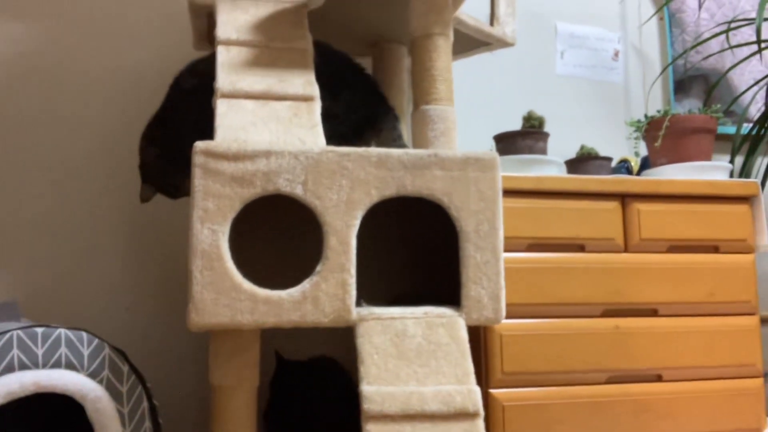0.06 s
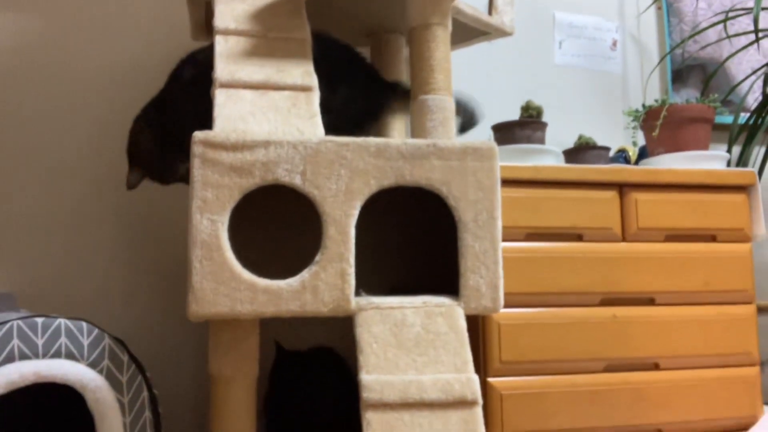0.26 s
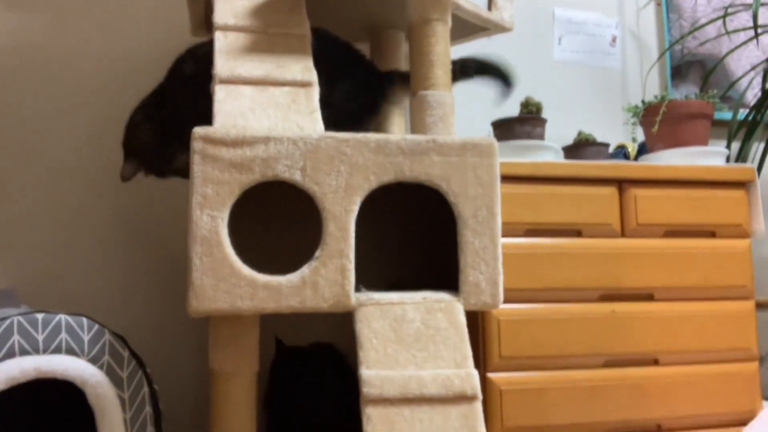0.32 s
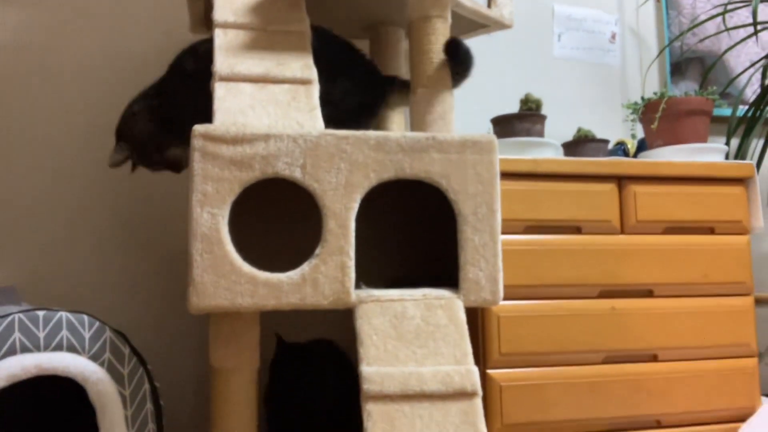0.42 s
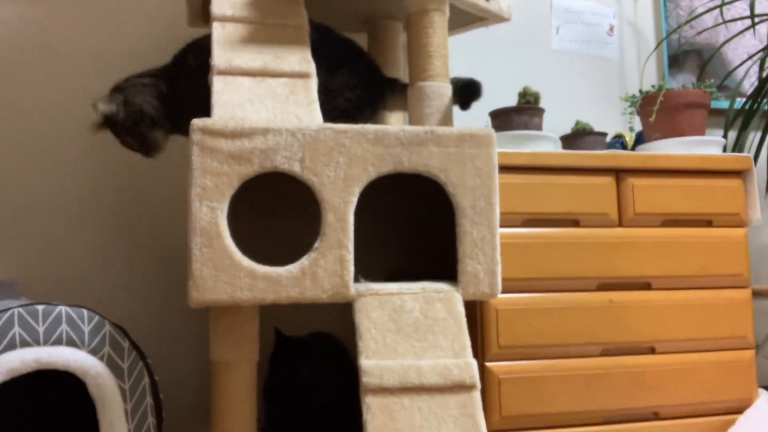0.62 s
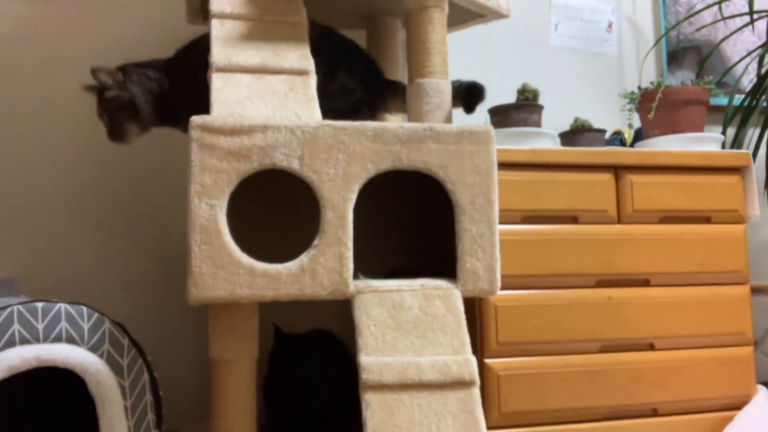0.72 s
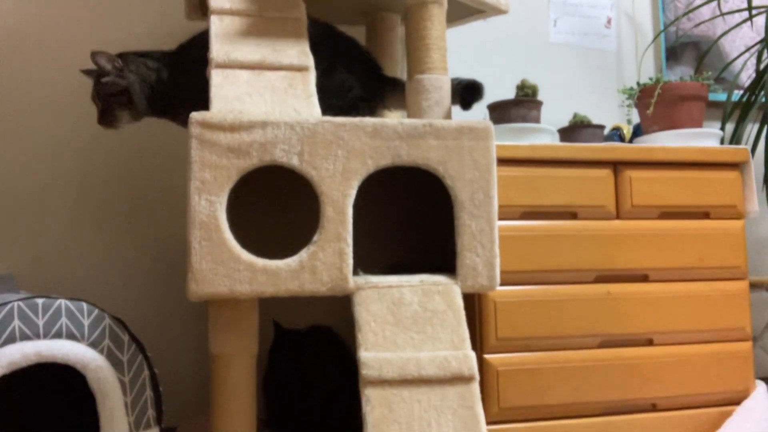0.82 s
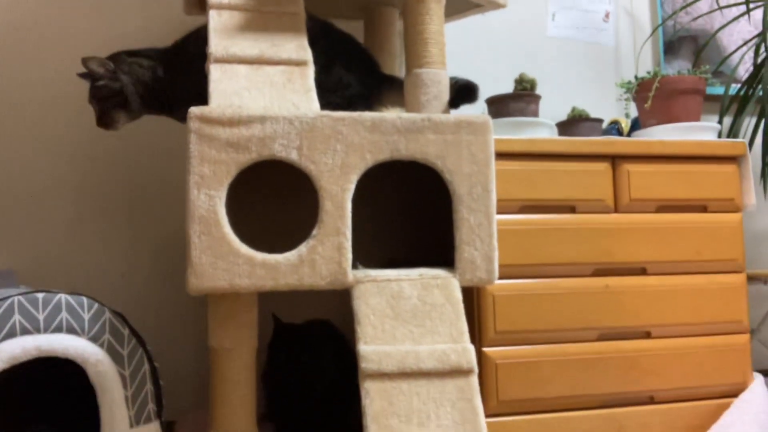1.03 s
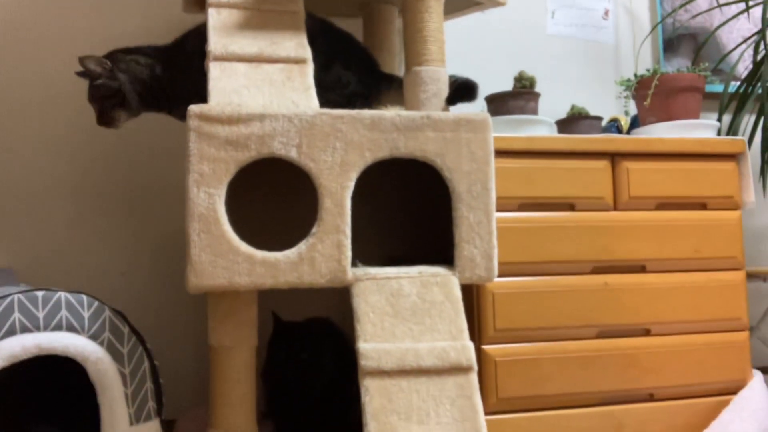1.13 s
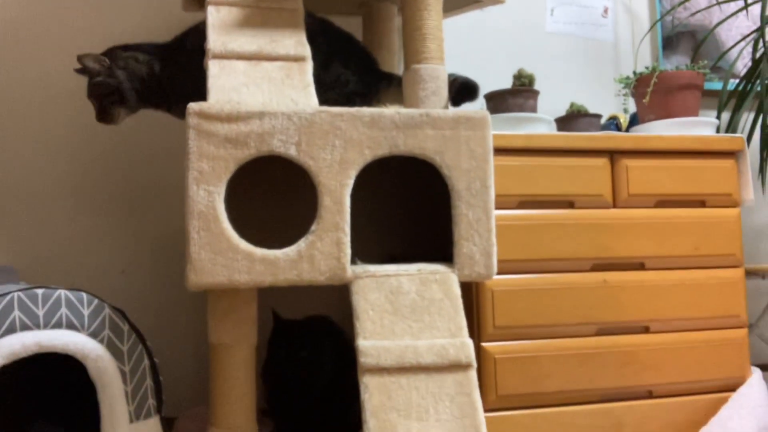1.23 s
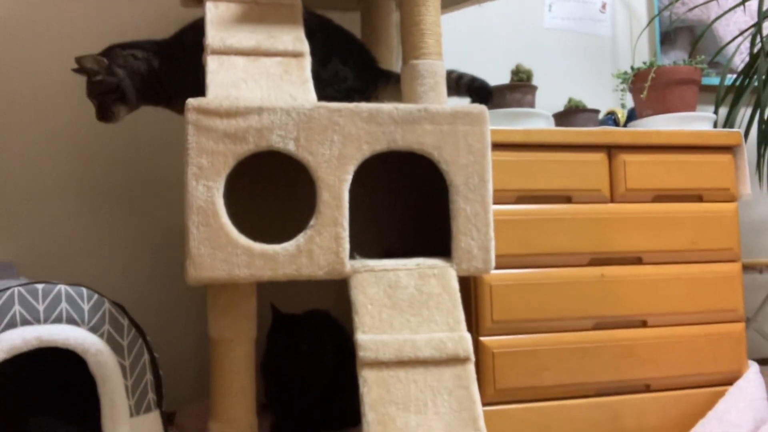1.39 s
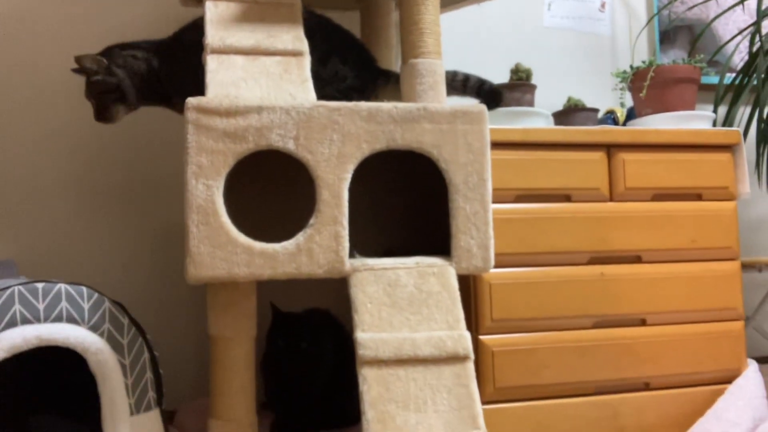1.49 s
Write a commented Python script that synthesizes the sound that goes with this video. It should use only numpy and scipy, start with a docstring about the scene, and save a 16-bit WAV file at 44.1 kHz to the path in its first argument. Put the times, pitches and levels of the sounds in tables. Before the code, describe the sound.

A bumped microphone thuds twice, first with a gritty scuff, amid soft finger taps indoors.

```python
"""A very quiet room, beside a cat tree: a hand-held camera takes two bumps.
Each knock travels through the casing to the microphone as a quick falling thud, treble first, bass last.
The first bump drags into a short, gritty scuff that overloads the microphone.
In between, fingers tap and shift softly over a faint bed of room tone."""
import sys
import numpy as np
from scipy import signal
from scipy.fft import rfft, irfft
from scipy.io import wavfile
from scipy.ndimage import uniform_filter1d

SR = 44100
rng = np.random.default_rng(int(sys.argv[2]) if len(sys.argv) > 2 else 0)


def output_pcm(signal):
    """Save a mono or channel-first signal as 16-bit PCM at the path in sys.argv[1].

    Samples are clipped to [-1, 1] before scaling.
    """
    pcm = np.clip(np.atleast_2d(signal).T, -1, 1) * 32767
    wavfile.write(sys.argv[1], SR, np.round(pcm).astype(np.int16))


N = 68355

# room tone, mostly low end: f/Hz, level/dB
ROOM_EQ = [(20, -19), (65, 8), (180, -2.5), (350, -12), (700, -18.5), (2000, -23), (5000, -28),
           (9500, -38.5), (14000, -25.5), (16000, -27.5)]
# light shifts of the grip: t/s, length/s, level/dB
GRIP_SHIFTS = [(0, .07, -57), (.05, .06, -49.5), (.09, .1, -60), (.158, 0.079, -47.5), (.82, 0.02, -60),
               (.92, 0.12, -61), (1.05, 0.059, -56), (1.16, 0.061, -55), (1.38, .04, -59.5)]
# muffled tone of the grip: f/Hz, level/dB
GRIP_EQ = [(20, -41), (50, -10.5), (78, 11), (130, -10), (200, -9.5), (450, -37.5), (700, -35.5),
           (1500, -53), (4000, -58.5)]
# soft finger taps: t/s, level/dB, roll-off f/Hz
FINGER_TAPS = [(.058, -4, 192), (.060, 14.5, 78), (.2075, 15.5, 135), (.2222, 4, 649), (.452, -11, 230),
               (.6112, -5, 464), (.636, -5, 127.8), (.8008, -1, 433), (.9069, -1, 395), (1.079, -6, 247),
               (1.1745, -6.5, 379), (1.2312, -6.5, 887), (1.391, -11.5, 219), (1.451, -18.5, 800),
               (1.452, -4, 109.4)]
# body of a tap: f/Hz, level/dB
TAP_EQ = [(20, -26), (45, -9.5), (75, -2), (130, -8), (200, 4), (280, -8), (370, 1), (480, -5),
          (700, -11.5), (1100, -8.5), (2000, -17.5), (16000, -25.5)]
# rubs on the casing, one envelope each; the third ends in a faint tail that lingers after the second knock:
# t/s, rumble level/dB, grit level/dB
SCUFF_ENVELOPES = [
    [(.212, -53.5, -85.5), (.222, -68, -66), (.232, -22.5, -53), (.242, -23.5, -43.5), (.251, -14, -26),
     (.258, -9.5, -11), (.277, -15.5, -14), (.286, -19, -20.5), (.301, -21, -25.5), (.308, -39, -37),
     (.314, -48.5, -55.5), (.333, -71, -86.5)],
    [(.94, -67, -90), (.975, -63, -86.5), (1.02, -77.5, -92.5)],
    [(1.228, -59.5, -99), (1.24, -39, -63), (1.25, -36.5, -39.5), (1.256, -34.5, -31.5),
     (1.266, -25, -34.5), (1.275, -34, -53.5), (1.281, -52, -74), (1.305, -78.5, -77.5),
     (1.4, -91.5, -87.5)],
]
# low layer of a scuff: f/Hz, level/dB
RUMBLE_EQ = [(20, -27), (50, -9), (75, 3.5), (160, 2), (260, -1.5), (400, 3), (650, -10), (1000, -26),
             (2000, -38.5), (6000, -71.5)]
# mid layer of a scuff: f/Hz, level/dB
GRIT_EQ = [(100, -26), (400, -1.5), (700, 9.5), (1500, 3.5), (2200, -7), (3200, -15), (5000, -20.5),
           (7000, -31), (10000, -43.5), (16000, -50)]
# top layer of a scuff: f/Hz, level/dB
FIZZ_EQ = [(3000, -38.5), (8000, -15), (10500, -9.5), (13000, 2), (16000, 3.5)]
# attacks of the crispest contacts: t/s, length/s, level/dB
SNAP_HITS = [(.2426, 0.0024, -32), (1.2520, 0.0024, -48), (1.4508, 0.0033, -73.5)]
# bright edge of a snap: f/Hz, level/dB
SNAP_EQ = [(500, -25.5), (2000, 5), (3300, 5.5), (5000, -1.5), (9000, -7), (13000, -8), (16000, -5)]
# knocks and duller rebounds on the casing: t/s, level/dB, roll-off f/Hz
KNOCK_HITS = [(.2427, 39, 1566), (.2433, 39.5, 182.8), (.2559, 43, 146.3), (.2613, 38, 700),
              (.2692, 38, 330), (.2723, 33.5, 260), (.2817, 33, 150), (.2921, 29.5, 909.6),
              (1.2519, 36, 1403), (1.2690, 25.5, 171.4)]
# body of a knock: f/Hz, level/dB
KNOCK_EQ = [(20, -31.5), (45, -16.5), (70, -3), (110, -1.5), (170, 1.5), (260, -2), (500, -1), (850, -12),
            (1500, -14.5), (2500, -19), (3300, -7.5), (5000, -20), (9000, -9.5), (15000, -4.5)]
# how late sound gets through the casing: f/Hz, approximate lag/cycles
CASING_LAG = [(40, 1.5), (80, 1.35), (140, 1.75), (250, 1.18), (600, 1.02), (2000, .92)]

TIME = np.arange(N) / SR
FREQS = np.fft.rfftfreq(2 * N, 1 / SR)  # padded, so tails do not wrap round


def amp(db):
    """Decibels to gain."""
    return 10 ** (np.asarray(db) / 20)


def curve_at(points, hz):
    """Reads a table on a log-frequency axis, with its corners rounded."""
    f, value = np.transpose(points)
    grid = np.linspace(0, np.log(SR), 1000)
    curve = np.interp(grid, np.log(f), value)
    rounded = uniform_filter1d(uniform_filter1d(curve, size=25), size=25)
    return np.interp(np.log(hz + 1), grid, rounded)


def noise(eq):
    """Steady noise through an EQ curve, rms 1."""
    gain = amp(curve_at(eq, np.fft.rfftfreq(N, 1 / SR)))
    shaped = irfft(rfft(rng.standard_normal(N)) * gain, N)
    return shaped / np.sqrt(np.mean(shaped ** 2) + 1e-20)


def steadied(x):
    """Levels out the slow swells of a noise, as under a steady pressure."""
    return x / np.sqrt(abs(uniform_filter1d(x ** 2, size=900)) + 1e-9)


def swells(rows):
    """Gain envelope with one swell a row: quick attack, slower release."""
    return sum(amp(db) * np.sin(np.pi * np.clip((TIME - start) / length, 0, 1) ** .7)
               for start, length, db in rows)


def thuds(hits, eq, slope):
    """Impulses through a shared body EQ, each with its own low-pass: harder contact is brighter."""
    spectrum = 0
    for start, db, rolloff_hz in hits:
        low_pass = 1 / np.sqrt(1 + (FREQS / rolloff_hz) ** (2 * slope))
        spectrum += amp(db) * low_pass * np.exp(-2j * np.pi * FREQS * start)
    return irfft(spectrum * amp(curve_at(eq, FREQS)))[:N]


def room_tone():
    """The still room: a barely audible low bed with a trace of hiss."""
    return amp(-74) * noise(ROOM_EQ)


def grip():
    """Faint low rubs as the fingers shift."""
    return swells(GRIP_SHIFTS) * steadied(noise(GRIP_EQ))


def taps():
    """Fingertips land on the casing with small, soft thumps."""
    return thuds(FINGER_TAPS, TAP_EQ, slope=2.5)


def scuffs():
    """Skin drags over the casing: low rumble, uneven grit on top, and fizz when it presses hard."""
    grain_db, grain_s = 2, .002
    grain = amp(grain_db * np.interp(TIME / grain_s, np.arange(N), rng.standard_normal(N)))
    rumble = steadied(noise(RUMBLE_EQ))
    grit = steadied(noise(GRIT_EQ) * grain)
    fizz = steadied(noise(FIZZ_EQ) * grain)
    mix = np.zeros(N)
    for envelope in SCUFF_ENVELOPES:
        times, rumble_db, grit_db = np.transpose(envelope)
        rumble_gain = amp(np.interp(TIME, times, rumble_db))
        grit_gain = amp(np.interp(TIME, times, grit_db))
        fizz_gain = amp(-17) * grit_gain ** 1.7  # the top end opens faster than the grit
        gate = (TIME > times[0]) & (TIME < times[-1])
        mix += (rumble * rumble_gain + grit * grit_gain + fizz * fizz_gain) * gate
    return mix


def snaps():
    """A few milliseconds of crack at the moment of hard contact."""
    return swells(SNAP_HITS) * noise(SNAP_EQ)


def knocks():
    """Two bumps on the casing, each a bright hit with duller rebounds."""
    return thuds(KNOCK_HITS, KNOCK_EQ, slope=3.9)


def casing(contacts):
    """Each frequency arrives a cycle or two late, so the bass trails and every hit falls in pitch."""
    delay_s = curve_at(CASING_LAG, FREQS) / (FREQS + 10)  # the offset keeps the delay finite at 0 Hz
    phase_turns = (np.cumsum(delay_s) - delay_s.sum()) * FREQS[1]
    return irfft(rfft(contacts, 2 * N) * np.exp(-2j * np.pi * phase_turns))[:N]


def scene():
    """Mono mix: everything that touches the camera plays through its casing, over the room tone."""
    bumps = knocks() + snaps() + scuffs()
    fingers = taps() + grip()
    return (room_tone() + casing(bumps + fingers))[None]


def record(dry):
    """The microphone sheds the sub-bass and soft-clips the loudest peaks; a steep high cut follows."""
    low_cut_hz, high_cut_hz = 40, 16100
    ceiling, knee = .94, 4.0
    low_cut = 1 - np.exp(-(FREQS / low_cut_hz) ** 2)
    trimmed = irfft(rfft(dry, 2 * N) * low_cut)[:, :N]
    clipped = trimmed / (1 + abs(trimmed / ceiling) ** knee) ** (1 / knee)
    high_cut = signal.firwin(511, high_cut_hz, window=("kaiser", 9), fs=SR)
    return signal.oaconvolve(clipped, high_cut[None], "same")


dry = scene()
out = record(dry)
output_pcm(out)
```